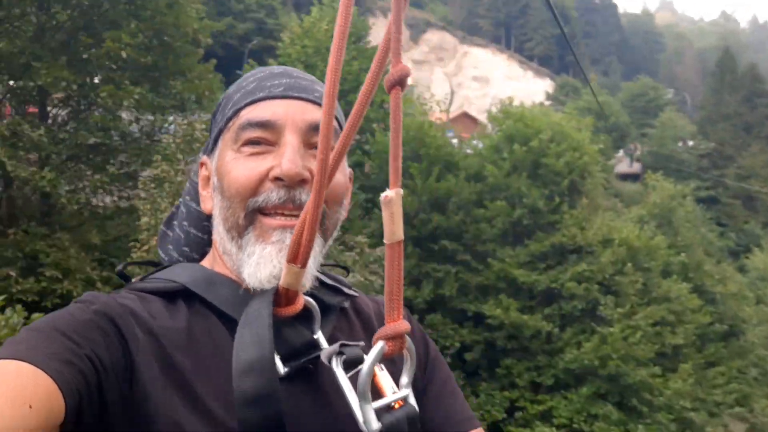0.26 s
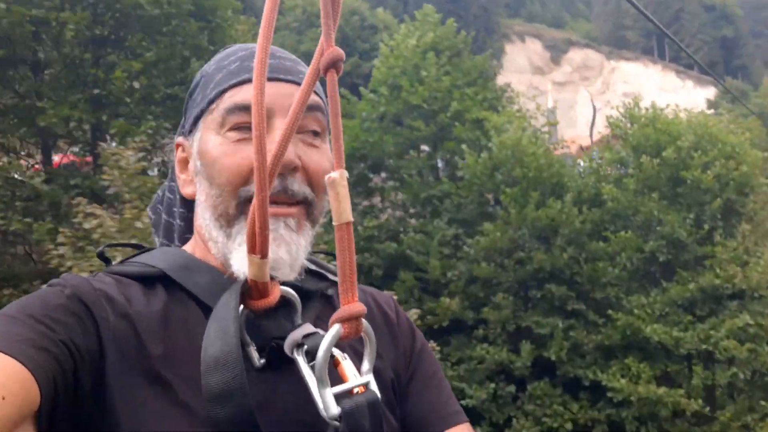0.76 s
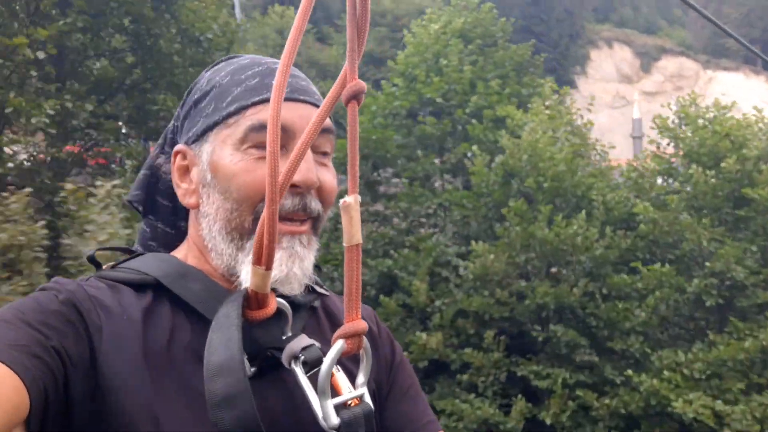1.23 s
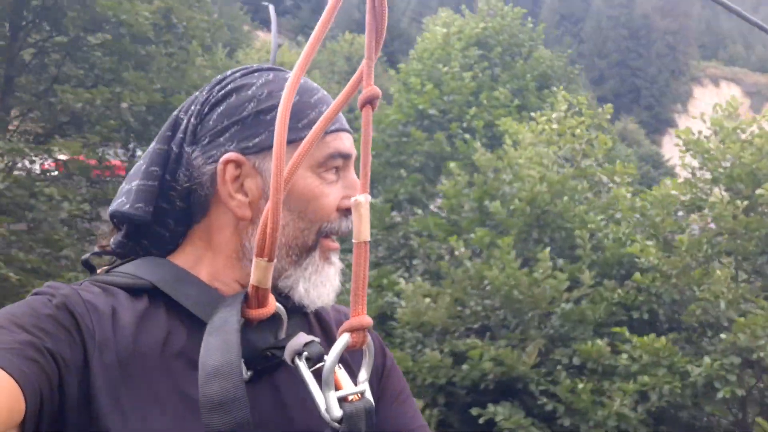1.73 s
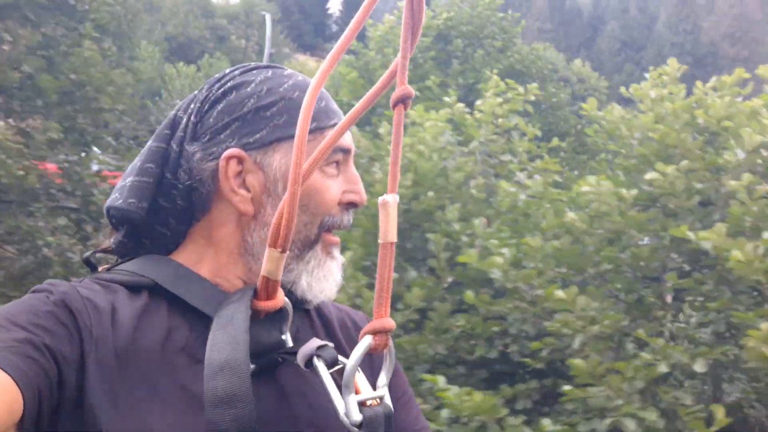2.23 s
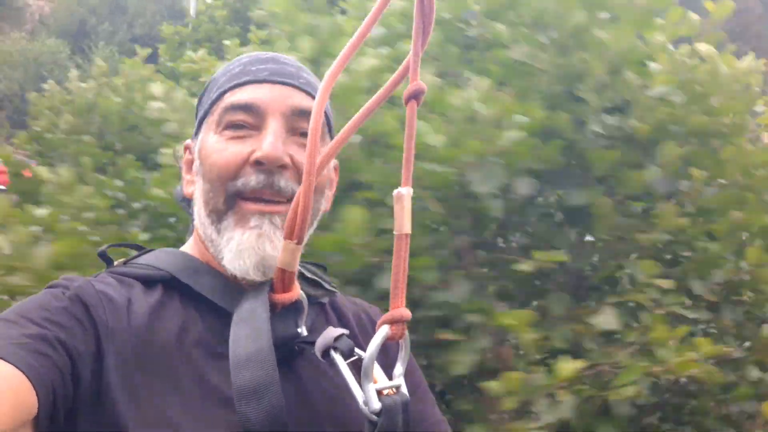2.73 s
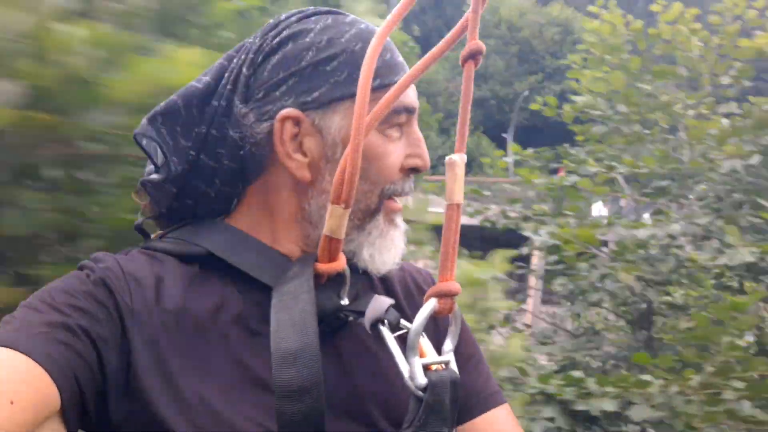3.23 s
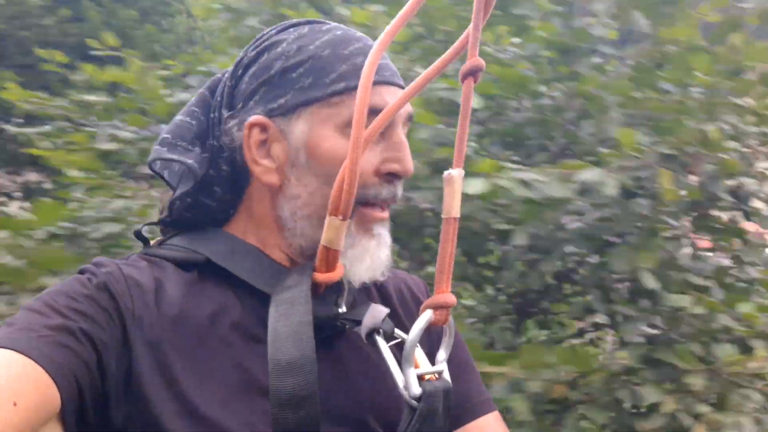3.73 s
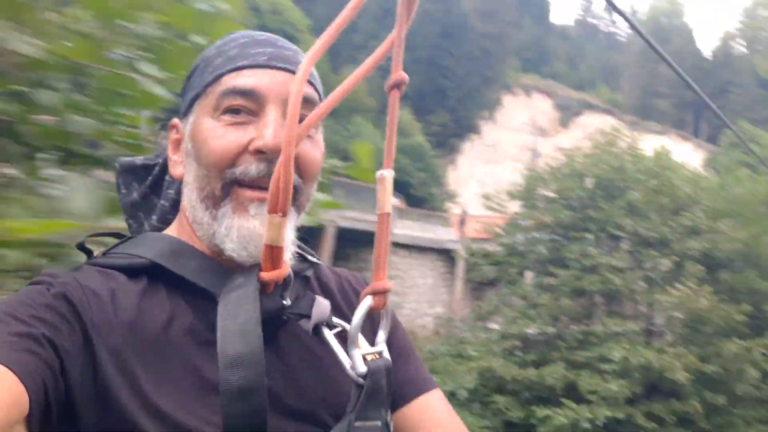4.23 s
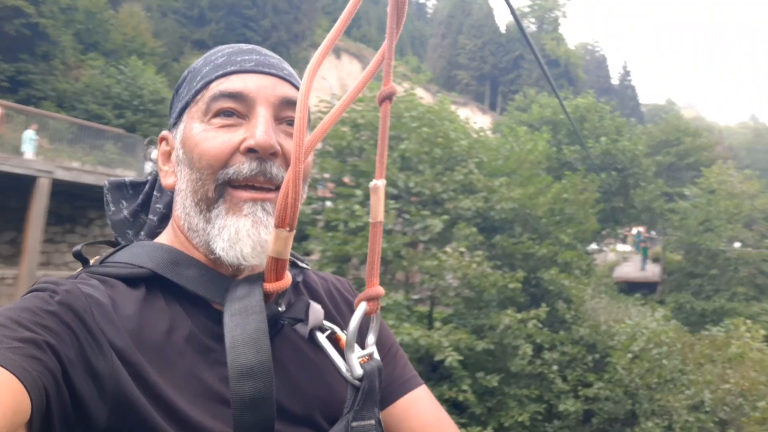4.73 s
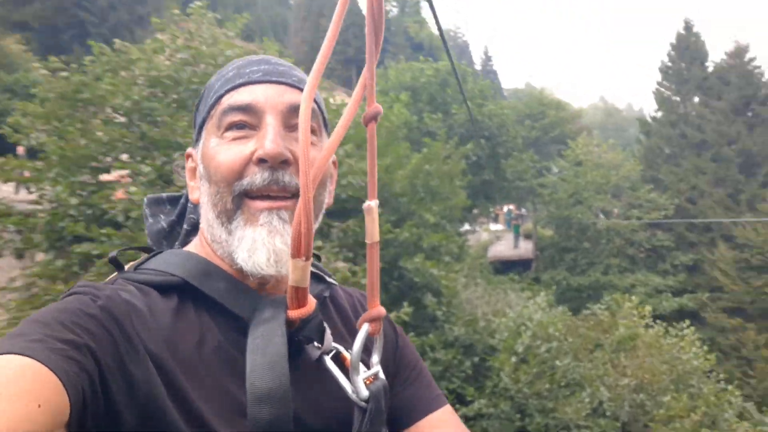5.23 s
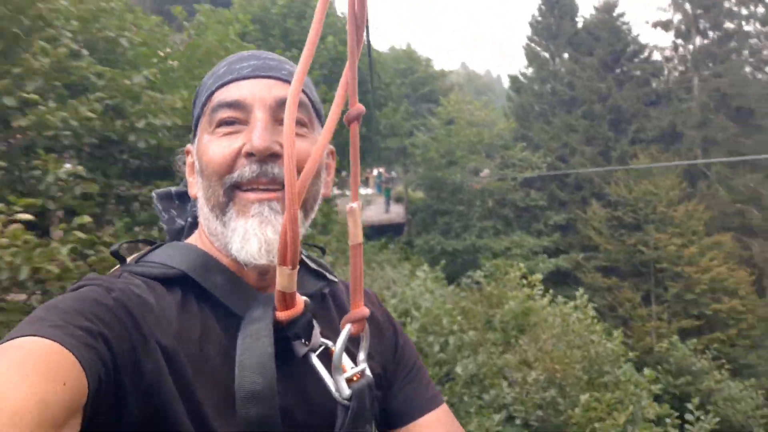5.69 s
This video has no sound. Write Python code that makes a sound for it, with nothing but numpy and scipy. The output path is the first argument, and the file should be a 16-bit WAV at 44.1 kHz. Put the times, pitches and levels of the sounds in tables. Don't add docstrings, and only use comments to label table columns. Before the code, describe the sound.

Continuous harsh rushing hiss of wheels running fast over a strand cable, thin metallic whine underneath, soft wind gusts on the microphone.

```python
import sys
import numpy as np
from scipy import signal
from scipy.fft import rfft, irfft, next_fast_len
from scipy.io import wavfile
from scipy.ndimage import map_coordinates

SR = 44100
rng = np.random.default_rng(int(sys.argv[2]) if len(sys.argv) > 2 else 0)


def field_ratio(decibels):
    return 10 ** (np.asarray(decibels, dtype=float) / 20)


def digitize_waveform(pressure):
    field = np.atleast_2d(pressure).T
    bounded = np.clip(field, -1, 1)
    quanta = np.round(bounded * 32767).astype(np.int16)
    wavfile.write(sys.argv[1], SR, quanta)


N = 262664
SECONDS = np.arange(N) / SR
SIZE = next_fast_len(N, True)
HZ = np.fft.rfftfreq(SIZE, 1 / SR)


def rms_one(x):
    return x / np.sqrt(np.mean(x ** 2) + 1e-20)


def in_time(rows):
    s, *columns = np.transpose(rows)
    return [np.interp(SECONDS, s, column) for column in columns]


def drift(rate):
    r = np.exp(-32 * np.pi * rate / SR)
    slow = signal.lfilter([1], [1, -2 * r, r * r], rng.standard_normal(N // 16 + 3002))
    slow = slow[3000:]
    return np.interp(np.arange(N) / 16, np.arange(len(slow)), rms_one(slow - slow.mean()))


# (time [s], rate [turns/s])
WHEEL_TURNS = [(0, 48.1), (.5, 48.05), (1.2, 48.6), (1.45, 48.4), (1.7, 48.9), (2.3, 48.4), (2.55, 48.6),
               (2.8, 48.05), (3.3, 47.95), (3.8, 47.5), (4, 46.9), (4.75, 46.2), (5, 46.3), (5.96, 45.2)]


def wheel_turning():
    turns, = in_time(WHEEL_TURNS)
    return 2 * np.pi * np.cumsum(turns) / SR


# (time [s], lead of the left port [us], tip back [0-1], frame hiss [dB], treble in clear view [dB])
PHONE_SWING = [(0, 86, 0.8, -14.5, 0), (.25, 82, 0.8, -14, -2), (.4, 39, 0.25, -14.5, 0),
               (.7, 38, 0.13, -15.5, 1.5), (.75, 7.4, 0.13, -16.5, -3.5), (1.2, 25, 0.1, -15.5, -2),
               (1.45, 40, 0.04, -15.5, -0.3), (2.0, 65, 0, -14.8, 1), (2.4, 86.3, 0.1, -13, 1),
               (3.05, 88, 0.1, -14.5, 0.5), (3.2, 117, 0, -15.5, -0.5), (3.65, 133.5, 0.2, -14, -0.5),
               (4.2, 102, 0.2, -14, -.3), (4.29, 59, 0, -15.2, 2.5), (4.8, 59, 0.32, -16.5, -2),
               (5.15, 37, 0.2, -16.5, 1.5), (5.27, 47.5, 0.52, -16.5, 1.5), (5.96, 48, 0.67, -15, 1.4)]


def phone_swing():
    return in_time(PHONE_SWING)


def strand_contacts(angle, per_s, spread_db, turn_db, third_db, flutter_db, sway_db, scatter_share):
    load_db = turn_db * np.cos(angle) + third_db * np.cos(3 * angle + 1)
    load_db += flutter_db * drift(62) + sway_db * drift(6.3)
    sizes_db = spread_db * np.minimum(rng.exponential(1, (2, N)), 4)
    sizes = field_ratio(sizes_db) * rng.choice([-1, 1], (2, N))
    struck = rng.random((2, N)) < per_s / SR
    clicks = rms_one(sizes * struck * field_ratio(load_db))
    scattered = rms_one(rng.standard_normal((2, 2, N)) * field_ratio(scatter_share * load_db))
    return rfft(clicks, SIZE), rfft(scattered, SIZE)


# (frequency [Hz], left minus right [dB], phase lead of the right [rad], likeness [0-1])
PORT_PAIR = [(600, .5, .5, .6), (1000, -1, .7, .92), (1400, -3.5, .45, .92), (2300, -1.7, -.25, .93),
             (3200, -1, .15, .91), (4100, -1, -.2, .85), (4800, 1, -.05, .8), (5600, 2.6, .7, .88),
             (7300, 1.3, .9, .6), (8300, -.5, 2.2, .64), (9800, -.3, 1.1, .65), (12400, -.8, 1.4, .6),
             (13800, -.2, 2.2, .35), (15500, -.2, 1.2, .3)]


def at_ports(clicks, scattered):
    port_hz, *port = np.transpose(PORT_PAIR)
    balance_db, lead, alike = [np.interp(HZ, port_hz, column) for column in port]
    direct = clicks[:, None] * np.array([np.ones_like(lead), np.exp(1j * lead)])
    mixed = np.sqrt(alike) * direct + np.sqrt(1 - alike) * scattered
    return field_ratio(balance_db * np.array([[.5], [-.5]])) * mixed


# (frequency [Hz], width [Hz], level with the phone facing [dB], extra side-on [dB], extra tipped back [dB])
FRAME_MODES = [(386, 340, -32, -1, 4), (617, 320, -25, -6, -1.5), (870, 238, -17, 2, -4.5),
               (1162, 394, -14, -6, 2.5), (1402, 250, -10, 1.5, 1), (1655, 365, -9.5, -0.5, -0.5),
               (2095, 515, -4, 3, -5.5), (2507, 620, -4.5, -5, 0.5), (2950, 404, -2, -0.5, -0.5),
               (3456, 600, 0.5, -1.5, 2), (3860, 790, -1.5, -2.5, 0.5), (4373, 620, -6, 2.5, -0.5),
               (4754, 390, -4, 0, -1), (5040, 460, -3, -1.5, 0), (5657, 430, -2.5, 0.5, -9.5)]
CHEEK_MODES = [(6180, 510, 5, 11.5, -0.52), (6810, 290, 0, 18, -2.9), (7090, 430, 7.5, 3.5, 1.6)]
TOP_MODES = [(8360, 530, 3.5, -4, -2.5), (9050, 460, -4.5, 0.5, 6.5), (10190, 320, 5, 1, -3),
             (10700, 380, 0.5, 3.5, 2.5), (11420, 410, -0.5, 3.5, 1), (12200, 700, -8, 3, -3),
             (12450, 670, 0.5, 4.5, 0.5), (13400, 700, -13, 0, -3.5), (13800, 900, -8, 10, 6.5),
             (14400, 1200, 0.5, -10, -2), (15300, 730, -11, 9, -7)]


def ringing(modes, forces, pose, patchy_db, play_db):
    side_on, tipped = pose
    out = np.zeros((2, N))
    for k, (hz, width, level_db, turned_db, tipped_db) in enumerate(modes):
        response = (1j * width * HZ / (hz ** 2 - HZ ** 2 + 1j * width * HZ)) ** 2
        gain_db = level_db + turned_db * side_on + tipped_db * tipped + patchy_db * drift(20)
        gain_db += play_db * np.clip(0.46 * np.log2(hz / 1300), .1, 1.2)
        out += field_ratio(gain_db) * irfft(response * forces[k % 2], SIZE)[:, :N]
    return rms_one(out)


# (loudest at [s], level [dB], rise [dB/s], fall [dB/s])
STRONG_SWELLS = [
    (0.43, -53.5, 24, 0.7),
    (0.31, -40.5, 42, 3.5),
    (2.5, -40.5, 2.7, 1.4),
]


def swells():
    levels_db = []
    for s, level_db, rise, fall in STRONG_SWELLS:
        below_db = np.where(SECONDS < s, rise * (s - SECONDS), fall * (SECONDS - s))
        levels_db.append(level_db - below_db)
    return levels_db


# (multiple of the turning rate, level [dB])
FAINT_LINES = [(11, -63.5), (12, -65), (17, -68), (18, -58), (19, -52.5), (22, -53), (23, -60), (25, -48)]


def whine(angle, strong_db, waver_db, wobble, lead):
    lines = list(zip((13, 16, 24), strong_db)) + list(FAINT_LINES)
    port_lead = np.array([[0], [lead]])
    out = np.zeros((2, N))
    for multiple, level_db in lines:
        phase = multiple * angle + wobble * drift(4.0) + rng.uniform(0, 7.6)
        level = np.sqrt(2) * field_ratio(level_db + waver_db * drift(2.1))
        out += level * np.sin(phase + port_lead)
    return out


# (time [s], extra level [dB], length [s])
GUST_EVENTS = [
    (0.055, 10, 0.16),
    (0.554, 7.5, 0.26),
    (1.987, 8, .25),
    (2.45, 7, 0.27),
    (2.95, 4.5, 0.24),
    (4.048, 4, 0.29),
    (4.3, 3.5, 0.15),
    (4.96, 4.5, 0.11),
    (5.698, 3, 0.24),
]


def airflow():
    calm_db, exposed_db = -51, 7.5
    exposed_s, lee_s, turn_s = 1.06, 4.6, 0.33
    exposed = np.clip(np.minimum(SECONDS - exposed_s, lee_s - SECONDS) / turn_s + .5, 0, 1)
    level_db = calm_db + exposed_db * exposed
    for s, extra_db, length in GUST_EVENTS:
        level_db += extra_db * np.exp(-.5 * (2 * (SECONDS - s) / length) ** 2)
    return level_db


# (frequency [Hz], level per Hz [dB])
WIND_COLOUR = [(15, -49), (25, -19.5), (99, 1.5), (166, 1.5), (242, -5), (420, -18.5), (452, -20),
               (500, -25), (650, -53), (1100, -120)]


def wind(wind_db, gust_db, lump_db):
    hz, level_db = np.transpose(WIND_COLOUR)
    colour = field_ratio(np.interp(np.log(HZ + 1), np.log(hz), level_db))
    lumps = np.array([drift(24), drift(24)])
    air = rng.standard_normal((2, N)) * field_ratio(gust_db * drift(8.9) + lump_db * lumps)
    return field_ratio(wind_db) * rms_one(irfft(rfft(air, SIZE) * colour, SIZE)[:, :N])


# (time [s], level [dB], length [ms])
EDDY_SLAPS = [
    (0.123, -35, 6),
    (1.279, -28, 6.2),
    (1.334, -35, 6),
    (1.54, -32, 4),
    (2.05, -30, 6.8),
    (2.447, -33, 8),
    (4.014, -27.5, 7),
    (4.276, -30, 8.3),
    (4.301, -28, 4.3),
    (5.942, -25, 4.1),
]


def slaps(top_hz):
    puffs = np.zeros(N)
    for s, level_db, ms in EDDY_SLAPS:
        puffs += field_ratio(level_db) * np.exp(-.5 * ((SECONDS - s) / (ms / 2000)) ** 2)
    dull = signal.butter(2, top_hz, fs=SR, output="sos")
    return puffs * rms_one(signal.sosfilt(dull, rng.standard_normal(N)))


def shaded(x, from_s, ramp_s, shade_db, below_hz):
    lows = irfft(rfft(x, SIZE) / (1 + (HZ / below_hz) ** 8), SIZE)[:, :N]
    share = np.clip((SECONDS - from_s) / ramp_s, 0, 1)
    return x + (field_ratio(shade_db * share) - 1) * lows


def scene():
    lead_us, tip, frame_db, clear_db = phone_swing()
    cheek_db, top_db = -11.5 + clear_db, -14.5 + clear_db
    pose = lead_us / 125, tip
    angle = wheel_turning()

    contacts = strand_contacts(angle, per_s=7000, spread_db=3.0, turn_db=0.5, third_db=.5,
                               flutter_db=0.46, sway_db=0.07, scatter_share=0.45)
    forces = at_ports(*contacts)
    play_db = 0.77 * drift(62) + 0.14 * drift(13) + 1.23 * drift(220) + 0.61 * np.cos(angle)
    trolley = field_ratio(frame_db) * ringing(FRAME_MODES, forces, pose, patchy_db=0.32, play_db=play_db)
    trolley += field_ratio(frame_db + cheek_db) * ringing(CHEEK_MODES, forces[::-1], pose, patchy_db=0.7, play_db=play_db)
    trolley += field_ratio(frame_db + top_db) * ringing(TOP_MODES, forces, pose, patchy_db=1.14, play_db=play_db)
    trolley = shaded(trolley, from_s=4.3, ramp_s=0.13, shade_db=-1.5, below_hz=2700)
    trolley += whine(angle, swells(), waver_db=1.5, wobble=1.2, lead=.45)

    late = np.arange(N) - lead_us * SR / 10 ** 6
    trolley[1] = map_coordinates(trolley[1], [late], order=5, mode="nearest")
    trolley[1] += slaps(top_hz=1020)
    return trolley + wind(airflow(), gust_db=2.0, lump_db=3.0)


def top_cut(x):
    return signal.sosfilt(signal.butter(12, 15770, fs=SR, output="sos"), x)


def record(dry):
    notch_hz, width_hz, depth = 7527, 2300, 0.8
    dip = 1j * width_hz * HZ / (notch_hz ** 2 - HZ ** 2 + 1j * width_hz * HZ)
    heard = irfft(rfft(dry, SIZE) * (1 - depth * dip), SIZE)[:, :N]
    mix = 1.3 * np.tanh(heard / 1.3)
    return top_cut(mix)


dry = scene()
out = record(dry)
digitize_waveform(out)
```